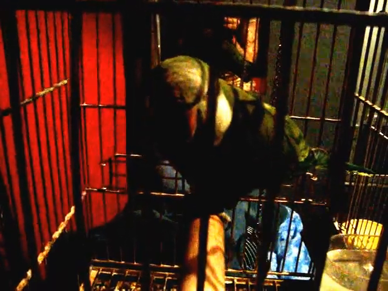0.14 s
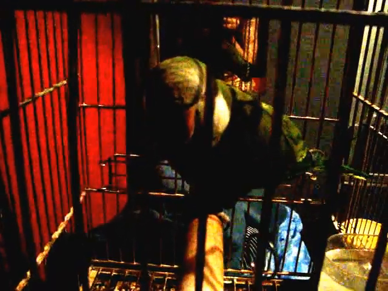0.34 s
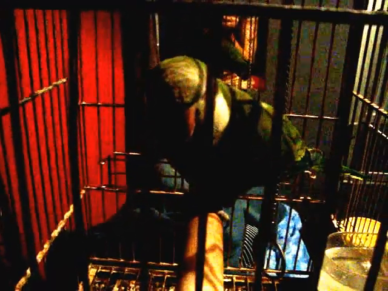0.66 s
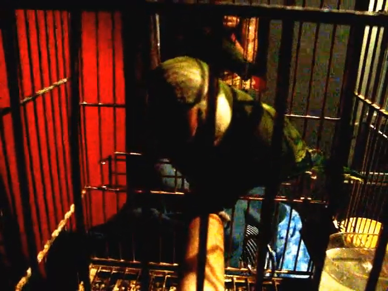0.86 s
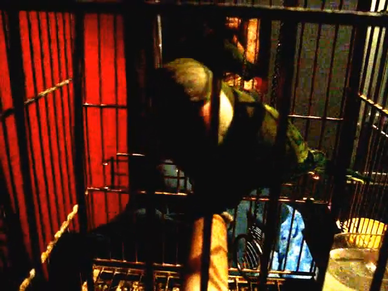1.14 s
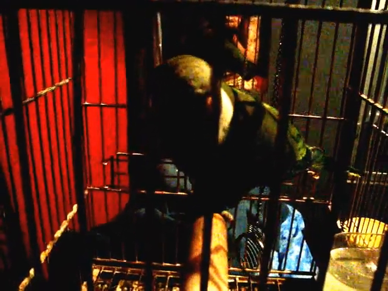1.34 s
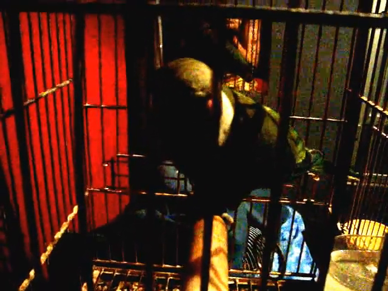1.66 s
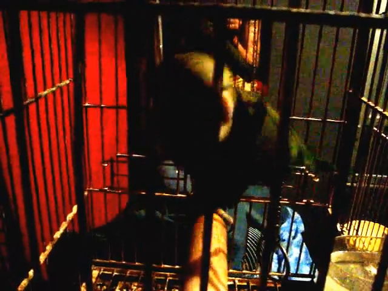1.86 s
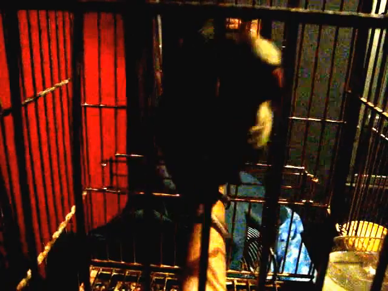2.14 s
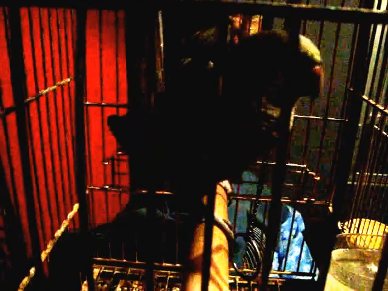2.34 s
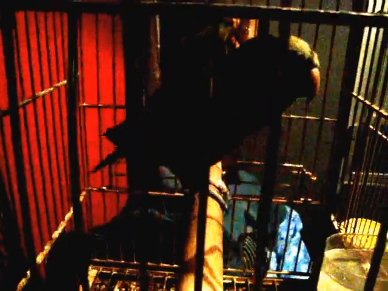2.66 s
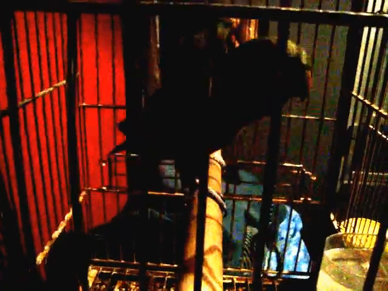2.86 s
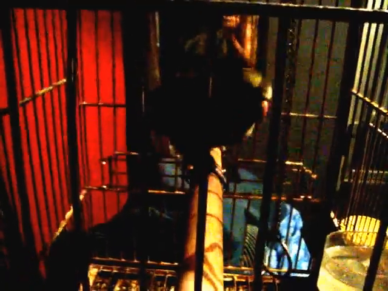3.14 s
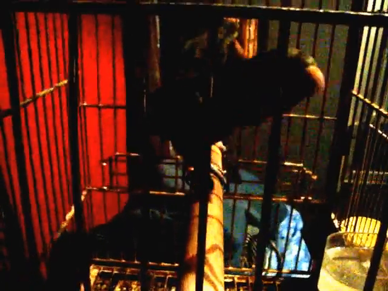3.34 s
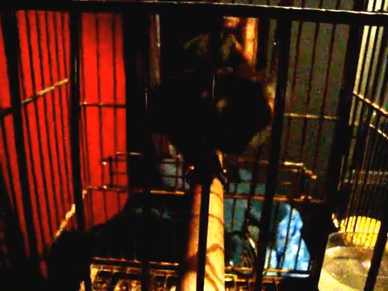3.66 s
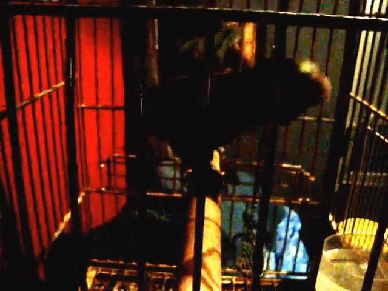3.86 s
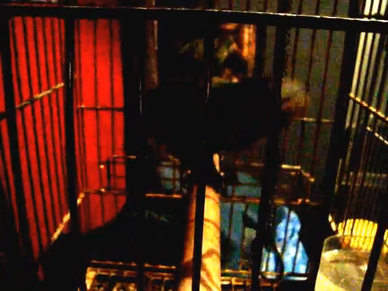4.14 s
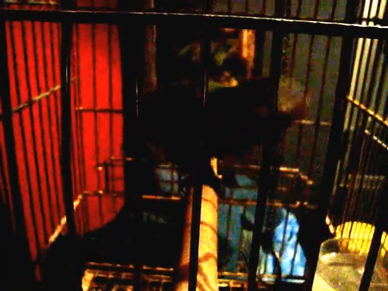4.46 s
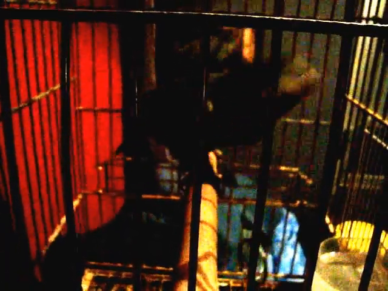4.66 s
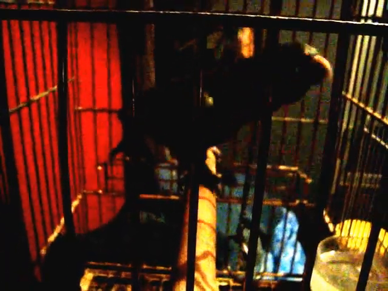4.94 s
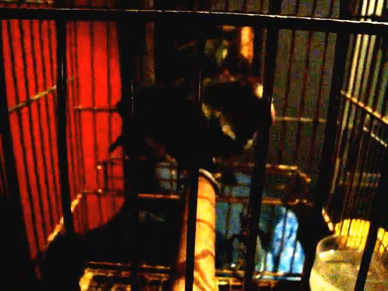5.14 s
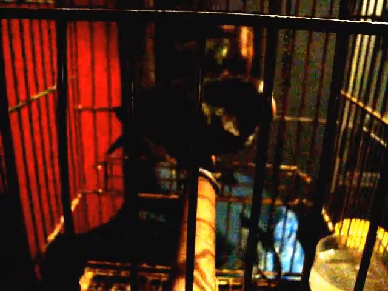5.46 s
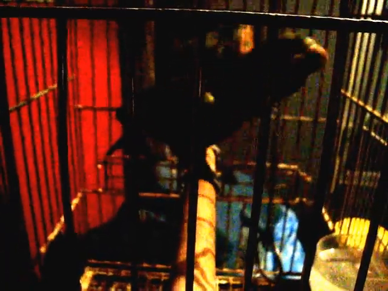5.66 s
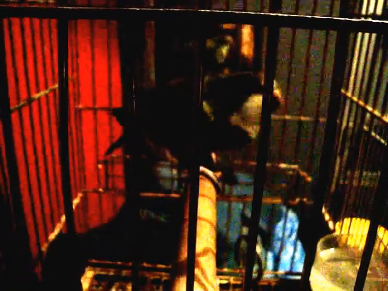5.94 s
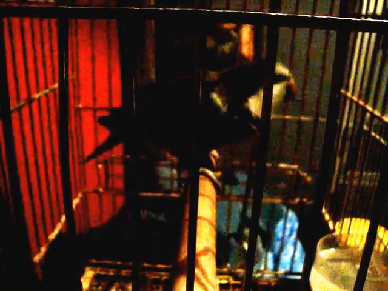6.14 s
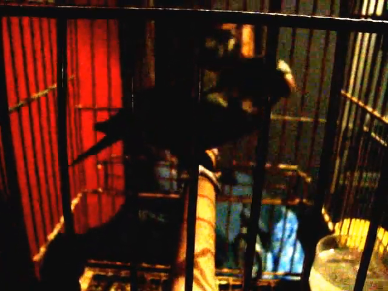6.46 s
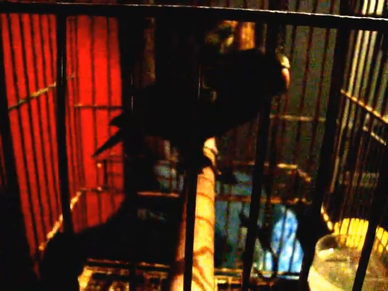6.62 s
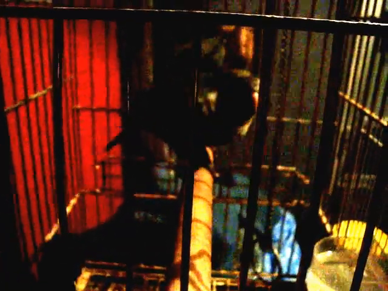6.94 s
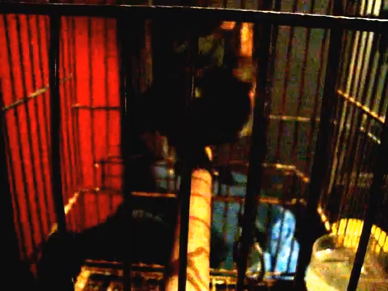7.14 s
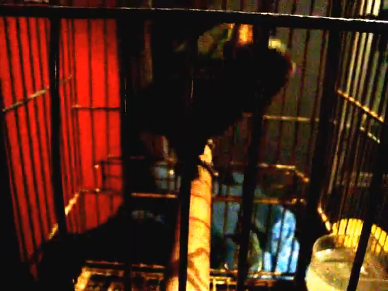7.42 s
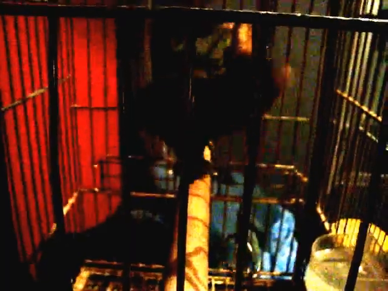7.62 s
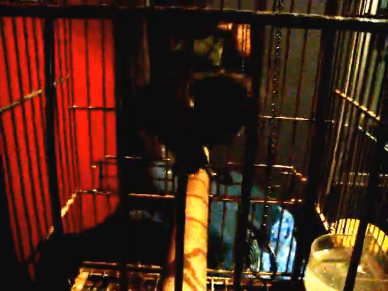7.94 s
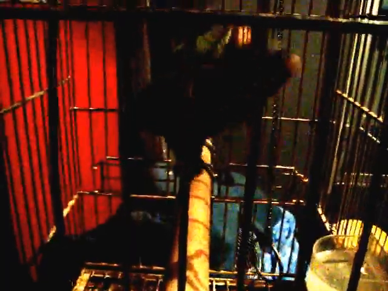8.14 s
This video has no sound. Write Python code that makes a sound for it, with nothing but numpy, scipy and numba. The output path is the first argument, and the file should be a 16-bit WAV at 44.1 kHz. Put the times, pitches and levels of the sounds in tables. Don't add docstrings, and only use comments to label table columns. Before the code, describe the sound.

A single parakeet chatters in a wire cage in a small, hard room, heard close through a cheap microphone with soft steady hiss. The faint tail of an earlier call is dying as a loud, raspy note slides downward at 0.1 s. A sharp beak click comes near 0.4 s, with even chirps. From 0.7 to 3.9 s short scratchy calls run quickly, about seven a second, abrupt falling barks alternating with upward chirps, some led by low croaks. A longer falling note swells at 4.0 s, then calls and a click resume. Another leaps up and falls at 5.2 s, followed by soft ticks. Chatter returns at 5.8 s; a click at 6.3 s precedes a broken, uneven falling note at 6.4 s. A small perch knock follows near 6.75 s, then rapid chirps continue to 8.2 s, with brief bright room reflections throughout.

```python
import sys
import numpy as np
from scipy import signal
from scipy.fft import rfft, irfft, next_fast_len
from scipy.io import wavfile
from scipy.ndimage import uniform_filter1d
from numba import njit

SR = 44100
rng = np.random.default_rng(int(sys.argv[2]) if len(sys.argv) > 2 else 0)


def master(y):
    cut = np.clip(np.atleast_2d(y).T, -1, 1)
    pcm = np.round(cut * 32767)
    wavfile.write(sys.argv[1], SR, pcm.astype(np.int16))


def magnitude_from_level(level_db):
    exponent = np.asarray(level_db, float) / 20
    return 10 ** exponent


N = 365588


def rms_one(x):
    return x / np.sqrt(np.mean(x ** 2) + 1e-20)


def at_hz(points, hz):
    points = np.array(points)
    return np.interp(np.log(hz), np.log(points[:, 0]), points[:, 1])


def in_time(tables, silent):
    rows = []
    for table in tables:
        first, last = np.array(table[0], float), np.array(table[-1], float)
        first[[0, silent]] = first[0] - .005, -75
        last[[0, silent]] = last[0] + .012, -75
        rows += [first, *table, last]
    s, *columns = np.transpose(np.array(rows, float))
    s = np.maximum.accumulate(s)
    return [np.interp(np.arange(N) / SR, s, column) for column in columns]


def coloured(x, spectrum):
    size = next_fast_len(N)
    gain = magnitude_from_level(at_hz(spectrum, np.fft.rfftfreq(size, 1 / SR) + 1))
    return irfft(rfft(x, size) * gain, size)[:N]


def flutter(hz):
    r = np.exp(-2 * np.pi * hz / SR)
    return rms_one(signal.lfilter([1], [1, -2 * r, r * r], rng.standard_normal(N)))


def clicks(events):
    train = np.zeros(N)
    for s, db in events:
        train[round(s * SR)] = magnitude_from_level(db)
    return train + 1e-18


def ring(train, hz, t60_s):
    r, w = magnitude_from_level(-60 / (t60_s * SR)), 2 * np.pi * hz / SR
    return signal.lfilter([0, np.sin(w)], [1, -2 * r * np.cos(w), r * r], train)


@njit
def moving_resonance(x, turn, r):
    out, a, b = np.zeros(len(x)), 0., 0.
    for i in range(len(x)):
        a, b = x[i] + 2 * r[i] * turn[i] * a - r[i] * r[i] * b, a
        out[i] = a - r[i] * turn[i] * b
    return out


def throat(x, hz, width_hz):
    return moving_resonance(x, np.cos(2 * np.pi * hz / SR), np.exp(-np.pi * width_hz / SR) * np.ones(N))


def evened(x, span_s):
    return x / np.sqrt(uniform_filter1d(x ** 2, int(span_s * SR)) + 1e-9)


def puffs(rate_hz, jitter, spread_db, breath):
    phase = np.cumsum(rate_hz * np.exp(jitter * flutter(150)) / SR)
    opened = np.diff(np.floor(phase), prepend=0)
    train = opened * magnitude_from_level(spread_db * rng.standard_normal(N))
    swell = signal.fftconvolve(train, np.hanning(int(0.0058 * SR)), "same")
    return rms_one(train) + breath * rms_one(swell * rng.standard_normal(N))


# frequency in Hz, level in dB.
HISS_SPECTRUM = [(18, -61), (30, -26.5), (372, -3), (699, -5), (1410, -7), (1560, -9.5), (2920, -18.5),
                 (3140, -18.5), (4850, -16), (9800, -24), (12700, -72.5), (21600, -120)]
HISS_DB = -51


def recorder_hiss():
    return magnitude_from_level(HISS_DB + .6 * flutter(1)) * rms_one(coloured(rng.standard_normal(N), HISS_SPECTRUM))


def earlier_call_echo():
    tail = rms_one(throat(rng.standard_normal(N), np.full(N, 3700.), width_hz=390))
    return magnitude_from_level(-35.5) * np.exp(-np.arange(N) / SR / 0.052) * tail


# frequency in Hz, T60 in seconds.
ROOM_T60 = [(200, 0.66), (2000, 0.52), (3400, 0.44), (4400, 0.37), (10000, 0.61)]


def room(x):
    hz, s, cells = signal.stft(rng.standard_normal(SR // 2), SR, nperseg=128)
    decay_db = -60 * s / at_hz(ROOM_T60, hz + 1)[:, None]
    tail = signal.istft(cells * magnitude_from_level(decay_db), SR, nperseg=128)[1]
    tail = tail * (1 - np.exp(-np.arange(len(tail)) / SR / 0.0025))
    return signal.fftconvolve(x, tail / np.sqrt(np.sum(tail ** 2)))[:N]


def turning(x):
    poses, turns_per_s = 5, 6.9
    pose = rng.integers(0, poses, 60)[(np.arange(N) / SR * turns_per_s + .7).astype(int)]
    return sum(room(x * uniform_filter1d(1. * (pose == k), size=200)) for k in range(poses))


def near_walls(x):
    lags_s = np.sort(rng.uniform(0.001515, .022, 14))
    echoes = np.zeros(int(.03 * SR))
    echoes[(lags_s * SR).astype(int)] = magnitude_from_level(-12.5 - 840 * lags_s) * rng.choice([-1, 1], len(lags_s))
    dulling = signal.butter(1, 5000, fs=SR, output="sos")
    return signal.sosfilt(dulling, signal.fftconvolve(x, echoes)[:N])


# time in seconds, peak in dB.
TICK = [
    (0.3767, -12.5),
    (1.261, -17.5),
    (6.278, -15.5),
    (4.307, -15.5),
    (5.5177, -21),
    (5.6311, -35),
    (5.6371, -41),
    (6.6992, -24),
]
# time in seconds, peak in dB.
KNOCK = [
    (.44, -45),
    (5.53, -48.5),
    (6.751, -35),
]
# frequency in Hz, level in dB, T60 in seconds.
PERCH = [(394, -1.5, 0.077), (528, 5, 0.045)]
SNAP_DB, SNAP_AFTER_S = 4, 0.0048


def cage():
    snaps = [(s + SNAP_AFTER_S, db + SNAP_DB) for s, _, db, *_ in FALLING]
    hit = clicks(TICK + snaps)
    tick = 1.56 * ring(hit, 3380, 0.0034) + 0.43 * ring(hit, 7100, 0.004) + 0.13 * ring(hit, 1600, 0.014)
    return tick + sum(magnitude_from_level(db) * ring(clicks(KNOCK), hz, t60_s) for hz, db, t60_s in PERCH)


# centre in seconds, peak in dB, pitch in Hz.
CROAK = [(0.796, -45, 686), (1.491, -41, 890), (2.441, -43, 597), (3.01, -43.5, 830), (3.281, -47, 700),
         (3.573, -45, 930), (4.731, -46, 950), (6.22, -41, 1030), (7.404, -43.5, 1025), (7.703, -42, 936),
         (8.002, -41.5, 830)]
CROAK_SAG = 0.28


def croaks():
    out, swell = np.zeros(N), np.hanning(int(.065 * SR))
    source = puffs(rate_hz=400, jitter=.3, spread_db=3.5, breath=1.0)
    slide = 1 + CROAK_SAG * np.linspace(1, -1, num=len(swell))
    r = np.full(len(swell), np.exp(-np.pi * 240 / SR))
    for s, db, hz in CROAK:
        i = round((s - .025) * SR)
        span = slice(i, i + len(swell))
        rung = moving_resonance(source[span], np.cos(2 * np.pi * hz * slide / SR), r)
        out[span] += magnitude_from_level(db) * swell * rms_one(rung)
    return out


# start in seconds, length in seconds, level in dB, first pitch in Hz, last pitch in Hz.
UNDER = [
    (.1, .09, -49, 2365, 1500),
    (4.01, 0.2, -42, 2335, 1250),
    (5.235, 0.032, -36.5, 2250, 2150),
    (5.278, 0.15, -45.5, 1407, 900),
    (6.482, .135, -41, 2737, 1330),
    (6.705, .04, -45, 1405, 863),
]
UNDER_BEND = [1.3, 1.9, 1.23, 0.79, 2.6, 1.04]
UNDER_FADE_DB = -3.5


def slides():
    out = []
    for (s, span, db, first, last), bend in zip(UNDER, UNDER_BEND):
        rows = []
        for u in np.linspace(0, 1, num=6):
            if bend > 1:
                hz = last + (first - last) * (1 - u) ** bend
            else:
                hz = first + (last - first) * u ** (1 / bend)
            rows.append((s + u * span, hz, db + UNDER_FADE_DB * u ** 4))
        out.append(rows)
    return out


def under_voice():
    pitch_hz, level_db = in_time(slides(), silent=2)
    phase = 2 * np.pi * np.cumsum(pitch_hz * (1 + .045 * flutter(80))) / SR
    return np.sqrt(2) * magnitude_from_level(level_db + 3 * flutter(80)) * np.sin(phase)


# start in seconds, length in seconds, peak in dB, first throat pitch in Hz, last in Hz.
FALLING = [(0.978, 0.041, -22.5, 3450, 1940), (1.649, .041, -19.5, 3850, 2100),
           (1.927, 0.04, -19.5, 4020, 2330), (2.603, 0.046, -20.5, 3860, 2120),
           (2.89, 0.043, -23.5, 3300, 1360), (3.164, 0.039, -22.5, 3540, 1800),
           (5.802, 0.045, -20, 3810, 1870), (6.102, 0.047, -22.5, 3990, 2080),
           (7.012, 0.035, -23.5, 3610, 2084), (7.884, .041, -22, 3380, 1970),
           (8.166, 0.037, -21, 3880, 2420)]
SAGGING = [(0.689, 0.059, -23, 3500, 1620), (1.253, 0.033, -27, 4030, 2700),
           (1.379, 0.068, -28.5, 3500, 1640), (2.331, 0.035, -27.5, 3200, 1760),
           (3.451, 0.039, -23.5, 3640, 1940), (3.72, 0.03, -21.5, 3620, 1770),
           (4.617, 0.034, -25, 3160, 1850), (4.904, 0.035, -23, 3444, 1920),
           (7.292, 0.037, -25, 3560, 2050), (7.583, 0.044, -23.5, 3700, 2300)]
RISING = [(0.819, 0.039, -21, 2080, 3670), (1.125, 0.036, -23.5, 2060, 3500),
          (1.503, 0.043, -29, 1820, 3420), (2.08, 0.04, -23, 2740, 3750), (2.459, 0.039, -28.5, 2360, 3330),
          (2.739, 0.029, -21.5, 2547, 3500), (3.033, 0.031, -28, 1670, 3000),
          (3.298, 0.049, -26, 1696, 3830), (5.048, 0.039, -26, 2120, 3600),
          (7.155, 0.025, -23.5, 2500, 3700), (7.434, 0.047, -30, 2740, 4060),
          (7.728, 0.047, -27.5, 2370, 3300)]
SURGING = [(1.789, 0.047, -21, 2820, 3700), (2.257, 0.033, -28.5, 3300, 3920),
           (3.59, 0.039, -27.5, 2008, 3230), (3.857, 0.041, -22.5, 2480, 3350),
           (4.311, 0.032, -26, 2230, 3450), (4.757, 0.07, -30.5, 2720, 3900),
           (5.952, 0.039, -27, 2270, 3930), (6.247, 0.054, -23.5, 3370, 3920),
           (8.02, 0.04, -24.5, 2390, 3620)]
EVEN = [
    (.375, 0.049, -26, 3010, 3340),
    (0.528, 0.067, -27.5, 3550, 3880),
    (1.322, 0.037, -35.5, 3460, 3800),
    (2.206, 0.021, -26.5, 3770, 3820),
    (4.461, 0.061, -29, 3830, 3500),
    (6.702, 0.043, -26, 3720, 3400),
    (6.849, 0.049, -22, 3600, 3600),
]
# share of length, level in dB re peak, share of the glide, extra beak gape in dB.
FALL_SHAPE = [(0, -3.5, 0.02, -1), (.2, -2.5, .12, 2.5), (.62, -7, .62, 1.5), (1, -12.5, 1, 2)]
SAG_SHAPE = [(0, -4.5, 0.02, 4), (.38, 0, 0.3, -0.5), (.72, -6, 0.79, -0.5), (1, -14, 0.93, -1)]
RISE_SHAPE = [(0, -5, 0.014, 2), (0.252, -2, 0.69, -0.5), (.65, -6.5, 0.78, 3), (1, -12.5, 0.85, 13.5)]
SURGE_SHAPE = [(0, -6.5, 0.02, 3), (.22, -6.5, .62, -0.5), (.58, -1.5, 0.93, -1), (.8, -7.5, 1, 0.5),
               (1, -20, .85, 15.5)]
EVEN_SHAPE = [(0, -4.5, 0.02, 8.5), (.4, -1.5, 0.39, -4), (0.699, -6, 0.46, 4.5), (1, -14.5, 0.73, -4.5)]
# time in seconds, level in dB, throat resonance in Hz.
LONG = [
    [(.092, -19, 3420), (.122, -22.5, 3310), (.151, -23.5, 3070), (.185, -25.5, 2870), (.237, -27.5, 2630),
     (.295, -40, 1600)],
    [(3.998, -24, 3810), (4.034, -28, 3520), (4.103, -26.5, 2990), (4.145, -22.5, 2850), (4.172, -23, 2180),
     (4.192, -33, 2170)],
    [(5.201, -24.5, 3480), (5.231, -29, 4100), (5.265, -27.5, 3380), (5.317, -26, 3040), (5.345, -27, 2550),
     (5.374, -27.5, 2280)],
    [(6.409, -32.5, 3970), (6.442, -25, 3630), (6.505, -35, 3006), (6.537, -29, 3240), (6.568, -26, 2800),
     (6.6, -35, 2600)],
]
GAPE_DB, GAPE_DB_PER_KHZ, GAPE_AT_HZ = -15.5, 8, 3500
LONG_GAPE_DB, LONG_GAPE_FADE_DB = 4.5, -11


def calls():
    out = []
    kinds = ((FALLING, FALL_SHAPE), (SAGGING, SAG_SHAPE), (RISING, RISE_SHAPE),
             (SURGING, SURGE_SHAPE), (EVEN, EVEN_SHAPE))
    for table, shape in kinds:
        for s, span, db, first, last in table:
            out.append([(s + u * span, db + rel_db, first + glide * (last - first), gape)
                        for u, rel_db, glide, gape in shape])
    for note in LONG:
        start, span = note[0][0], note[-1][0] - note[0][0]
        out.append([(s, db, hz, LONG_GAPE_DB + LONG_GAPE_FADE_DB * (s - start) / span)
                    for s, db, hz in note])
    return sorted([(s, db, hz, gape + GAPE_DB + GAPE_DB_PER_KHZ * (hz - GAPE_AT_HZ) / 1000)
                   for s, db, hz, gape in call] for call in out)


# frequency in Hz, gain in dB.
RASP = [(200, -49), (400, -29), (900, 0.5), (1500, 2.5), (2300, 9.5), (3500, -11), (4500, -16.5),
        (5200, -6.5), (7000, -15)]
# frequency in Hz, gain in dB.
TREBLE = [(3500, -29), (5000, 4.5), (7000, 4.5), (10000, -9.5)]
WINDPIPE_HZ, WINDPIPE_WIDTH_HZ, WINDPIPE_DB = 3380, 480, -8.5


def voice():
    level_db, throat_hz, treble_db = in_time(calls(), silent=1)
    source = puffs(rate_hz=450, jitter=.4, spread_db=2.5, breath=3)
    wobble_hz = throat_hz * (1 + .025 * flutter(120))
    held = in_time(LONG, silent=1)[0] > -60
    width_hz = np.clip(880 + 27 * treble_db, 380, None) - 165 * held
    tone = throat(source, wobble_hz, width_hz)
    tone = evened(throat(tone, wobble_hz, 3 * width_hz), .012)
    rasp = magnitude_from_level(0.29 * treble_db - 3.1 * held) * evened(coloured(source, RASP), 0.016)
    treble = magnitude_from_level(treble_db) * evened(coloured(source, TREBLE), 0.0085)
    pipe = source
    for _ in range(2):
        pipe = throat(pipe, np.full(N, float(WINDPIPE_HZ)), WINDPIPE_WIDTH_HZ)
    pipe = magnitude_from_level(WINDPIPE_DB - 7.0 * held) * evened(pipe, .011)
    shaken = sum(magnitude_from_level(db) * ring(magnitude_from_level(level_db) * rng.standard_normal(N), hz, t60_s)
                 for hz, db, t60_s in PERCH)
    return magnitude_from_level(level_db) * (magnitude_from_level(0.5) * tone + magnitude_from_level(-3.0) * rasp + treble + pipe) + magnitude_from_level(-51.5) * shaken


def scene():
    bird = voice() + under_voice() + croaks() + cage()
    no_bass = signal.butter(3, 230, "high", fs=SR, output="sos")
    bird = signal.sosfilt(no_bass, bird)
    bird = bird + near_walls(bird)
    return (bird + magnitude_from_level(-8.5) * turning(bird) + earlier_call_echo() + recorder_hiss())[None]


# start in seconds, lower edge in Hz.
BLANK = [(.071, 2000), (0.358, 4000), (0.507, 3500), (1.114, 5500), (1.228, 4500), (1.366, 5500),
         (1.625, 3500), (1.907, 4500), (2.589, 3500), (2.877, 4000), (3.132, 3000), (3.423, 3500),
         (3.706, 4500), (4.284, 4000), (4.428, 4000), (4.604, 5000), (5.036, 5500), (5.181, 4000),
         (5.503, 4500), (6.081, 2000), (6.227, 4500), (6.983, 4000), (7.127, 4500), (7.27, 4000),
         (7.418, 4500), (7.558, 3000), (8.135, 3000)]
BLANK_LEAD_S = 0.0021


def mute_before_attacks(cells, hz, s):
    attacks = np.sort([call[0][0] for call in calls()] + [tick[0] for tick in TICK])
    for start, above_hz in BLANK:
        end = attacks[attacks > start][0] - BLANK_LEAD_S
        ragged = np.repeat(rng.random(33) < .17, 2)[:len(hz)] & (hz < 1.5 * above_hz)
        cells[np.ix_((hz > .7 * above_hz) & ~ragged, (s > start) & (s < end))] *= magnitude_from_level(-38)
    for call in RISING + SURGING:
        span, edge = rng.random(2)
        low_hz = 1900 + 1200 * edge
        when = (s > call[0] - .008 - .014 * span) & (s < call[0] - .003)
        cells[np.ix_((hz > low_hz) & (hz < low_hz + 1800), when)] *= magnitude_from_level(-18)


def thin_treble(cells, hz, s):
    for call in FALLING + SAGGING + RISING + SURGING + EVEN:
        when, span, edge = rng.random(3)
        start = call[0] + call[1] - .012 + .012 * when
        inside = (s > start) & (s < start + .007 + .012 * span)
        cells[np.ix_(hz > 4500 + 3000 * edge, inside)] *= magnitude_from_level(-20)
    for when, span, pitch in rng.random((600, 3)):
        start, low_hz = when * N / SR, 4200 + 5500 * pitch
        inside = (s > start) & (s < start + .003 + .009 * span)
        cells[np.ix_((hz > low_hz) & (hz < low_hz + 800), inside)] *= magnitude_from_level(-20)


def roll_off(x):
    return signal.sosfilt(signal.butter(12, 10920, fs=SR, output="sos"), x)


def record(dry):
    rounded = .42 * np.tanh(dry[0] / .42)
    hz, s, cells = signal.stft(rounded, SR, nperseg=128, noverlap=96)
    mute_before_attacks(cells, hz, s)
    thin_treble(cells, hz, s)
    x = signal.istft(cells, SR, nperseg=128, noverlap=96)[1][None, :N]
    top_cut = signal.cheby2(16, 60, 10600, fs=SR, output="sos")
    return roll_off(signal.sosfilt(top_cut, x))


dry = scene()
out = record(dry)
master(out)
```